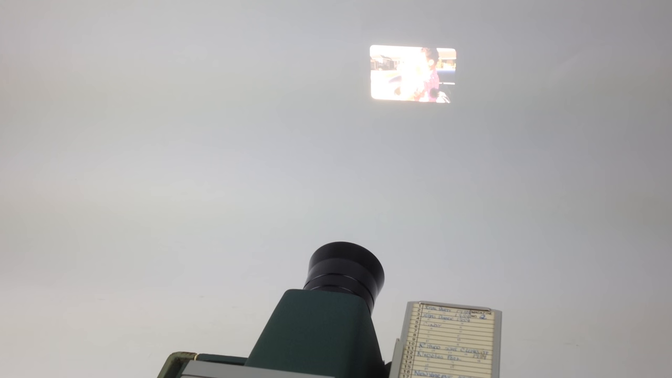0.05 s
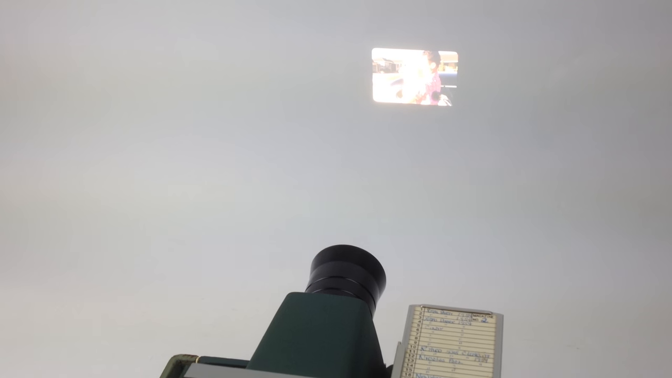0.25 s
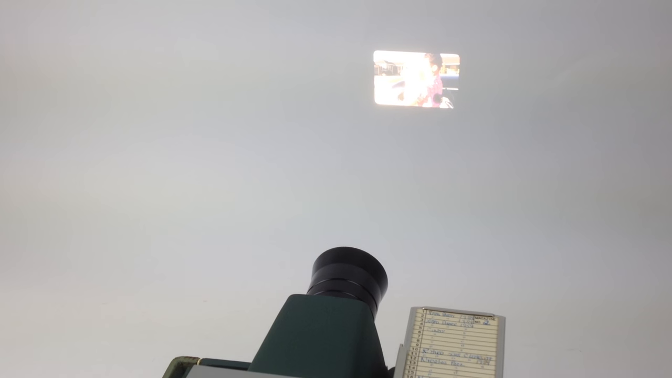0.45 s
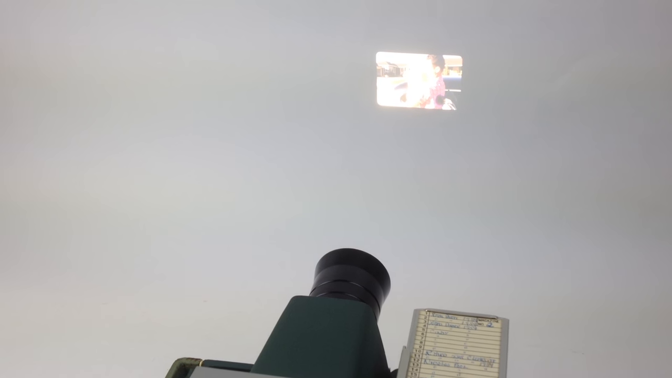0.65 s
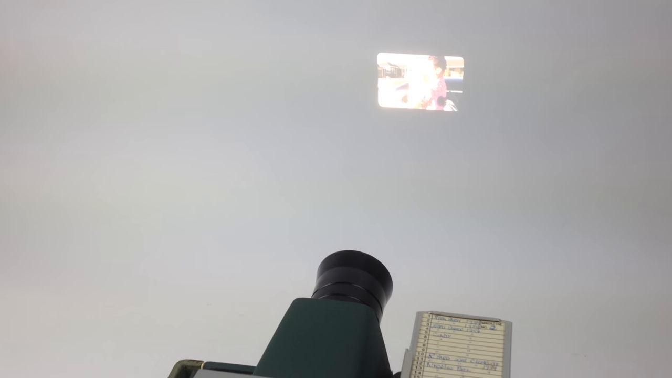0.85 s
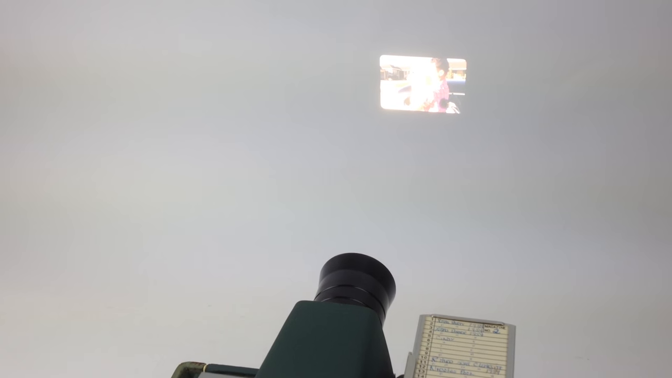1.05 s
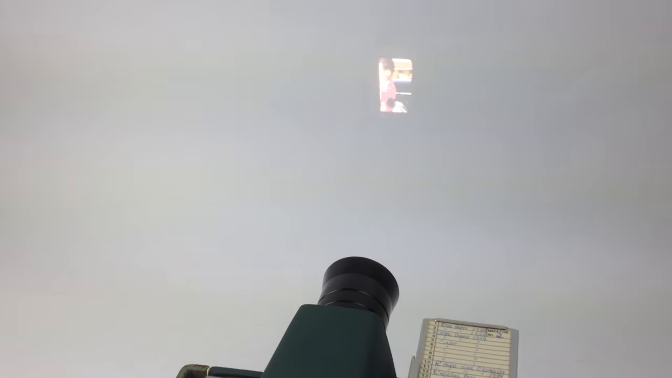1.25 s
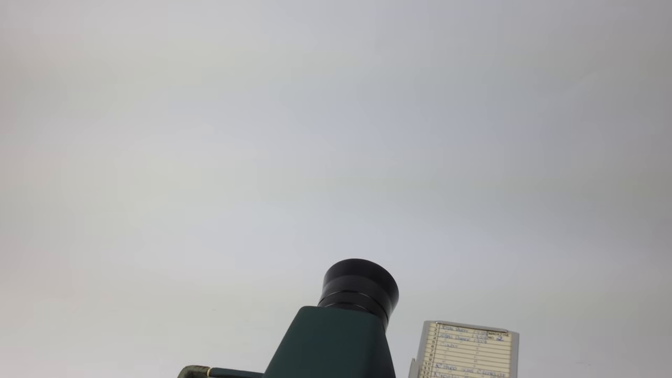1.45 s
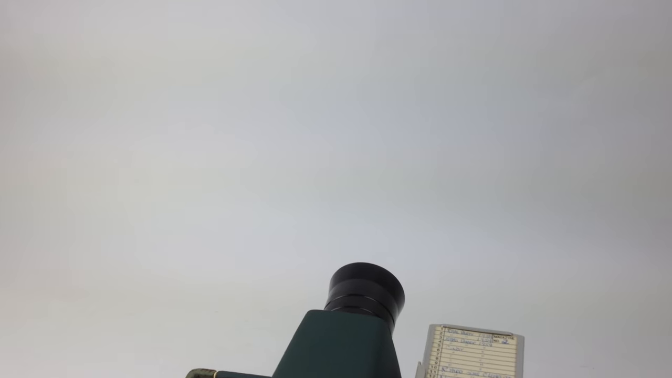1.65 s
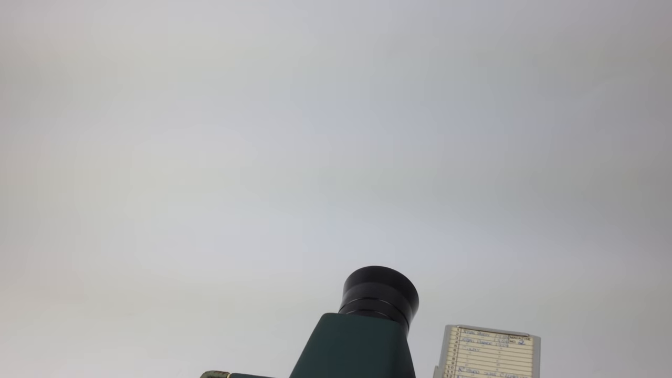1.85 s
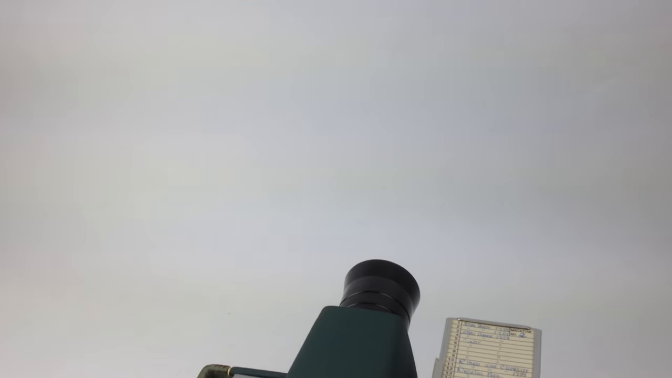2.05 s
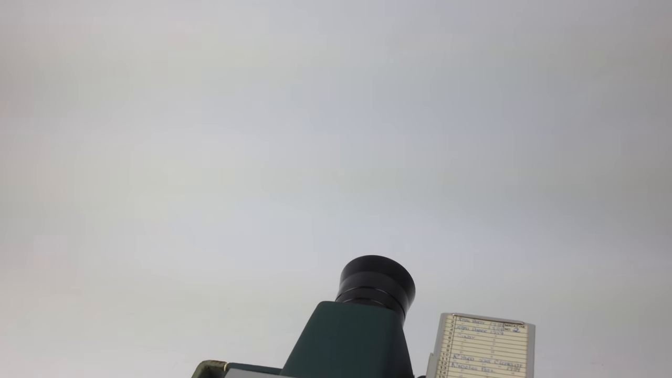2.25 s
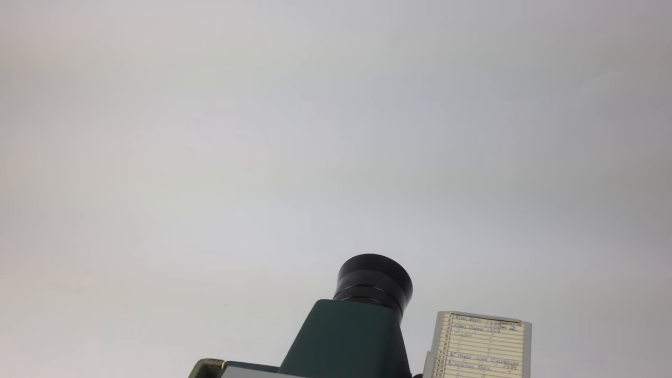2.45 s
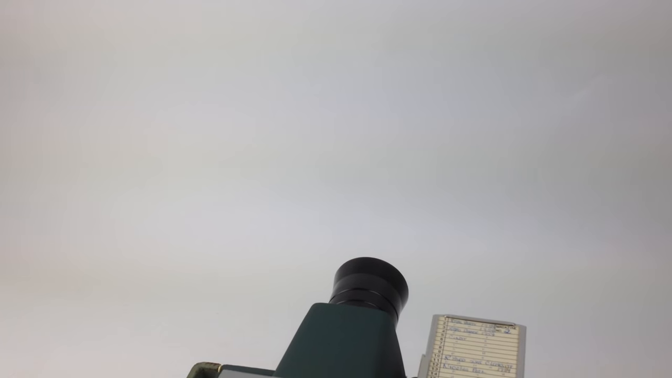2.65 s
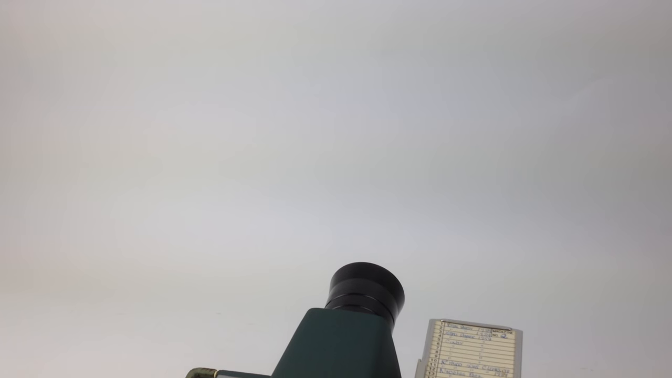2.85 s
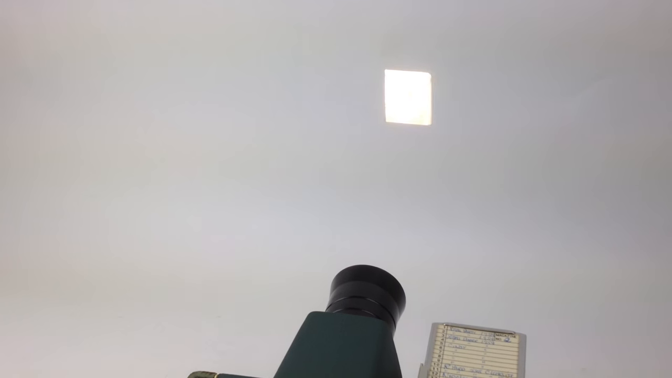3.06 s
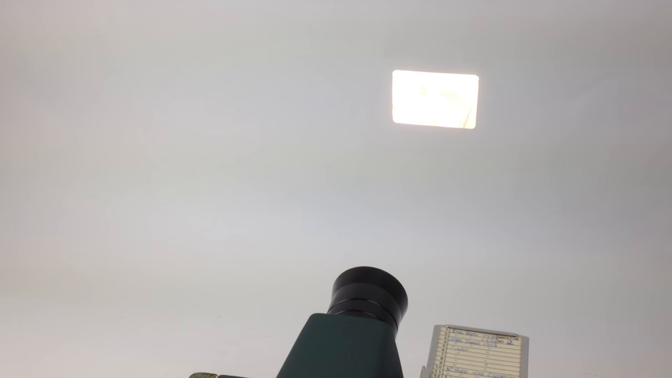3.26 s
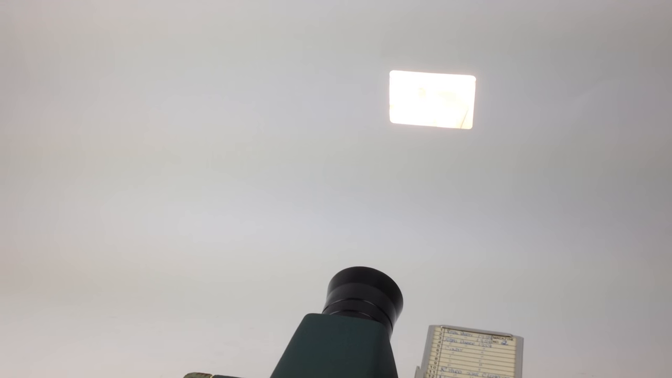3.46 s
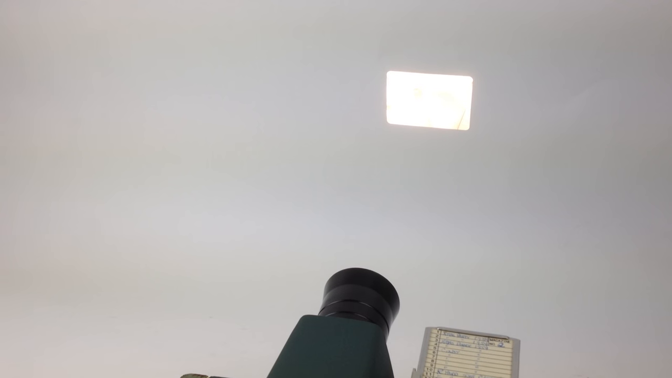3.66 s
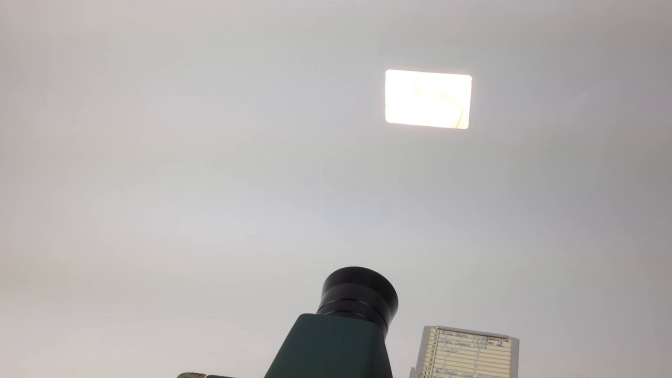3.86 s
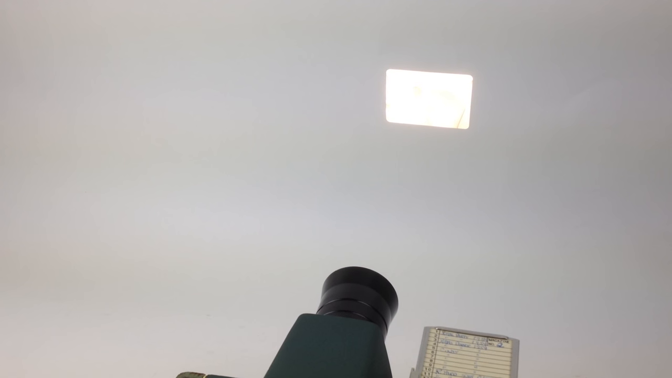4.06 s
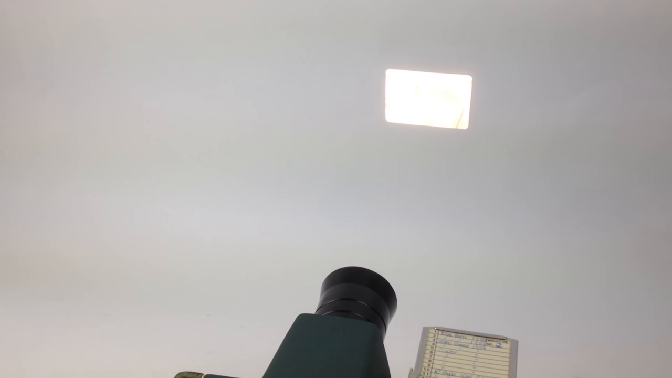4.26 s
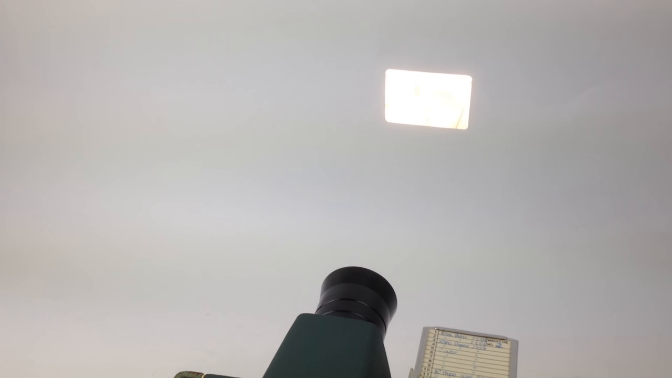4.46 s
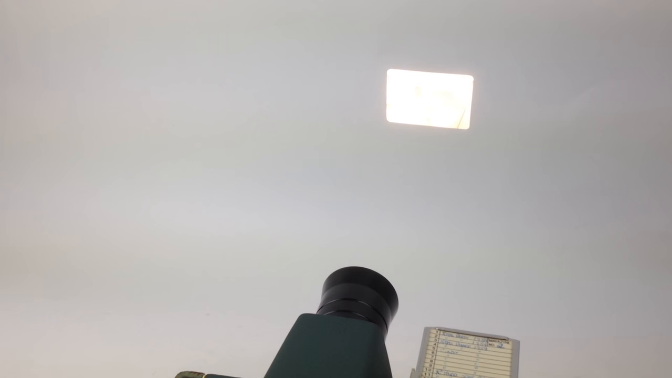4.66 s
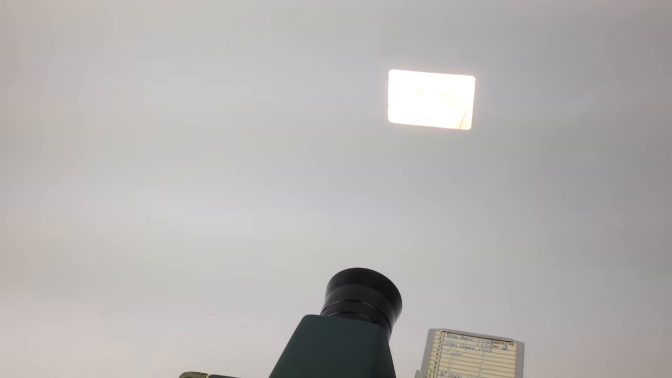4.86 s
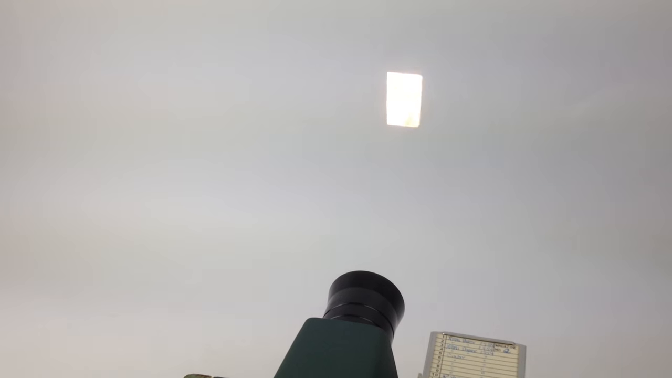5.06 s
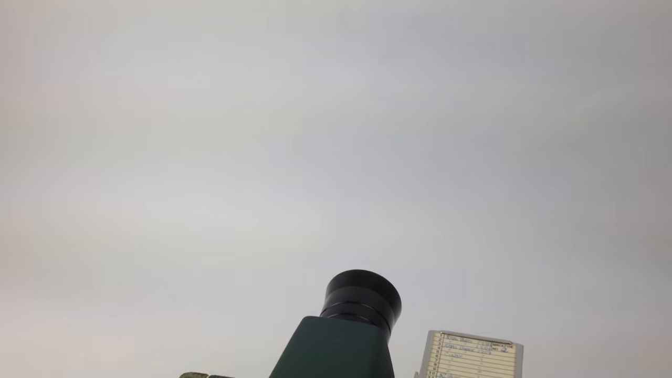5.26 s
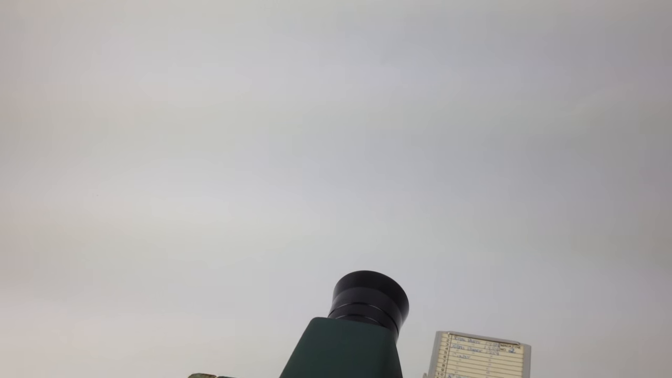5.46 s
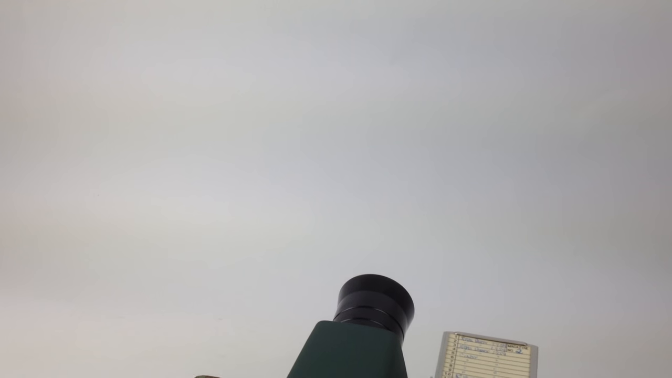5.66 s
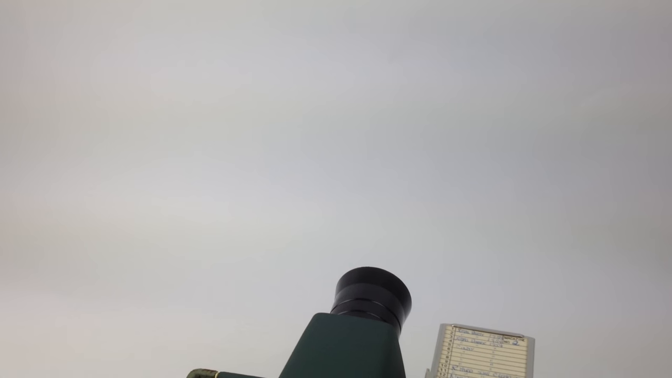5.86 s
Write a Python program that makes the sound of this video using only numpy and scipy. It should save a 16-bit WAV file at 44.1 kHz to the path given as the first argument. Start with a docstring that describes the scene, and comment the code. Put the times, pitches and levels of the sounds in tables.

```python
"""Slide projector in a small room

The cooling fan hums and rushes: filtered noise for the air, sine waves for blades and motor.
A hand works the slide changer three times. The carrier scrapes (random grains) and squeaks
(gliding sines), then clacks against its stop (bursts of filtered noise, some over hollow rings
of fading sines) while the slide rattles. A soft rub within a faint hiss comes early on.
Loud clacks make the recorder turn down, then creep back up."""
import sys
import numpy as np
from scipy import signal
from scipy.fft import rfft, irfft, next_fast_len
from scipy.io import wavfile
from scipy.ndimage import uniform_filter1d, minimum_filter1d

SR = 44100
rng = np.random.default_rng(int(sys.argv[2]) if len(sys.argv) > 2 else 0)


def wav_record(signal):
    """Record a signal, one row per channel, as 16-bit PCM in the file named by sys.argv[1]."""
    frames = np.transpose(np.atleast_2d(signal))
    bounded = np.clip(frames, -1, 1)
    # unit amplitude maps onto the largest positive 16-bit level
    quanta = np.round(bounded * 32767).astype(np.int16)
    wavfile.write(sys.argv[1], SR, quanta)


N = 261072
TIME = np.arange(N) / SR

# Hard contacts in the changer; hardness is the bright tick's level over the metal ring.
# Small level offsets and shares of t60_s for each part are set in the function.
# Columns: start_s, metal_db, hardness_db, knock_db, t60_s (time to fade by 60 dB)
CONTACTS = [(0.3215, -40, -28, -62, 0.013), (0.7995, -28.5, -2.5, -42, .022),
            (1.2245, -30.5, -37, -46, 0.036), (1.3045, -34, -8, -43, 0.06), (1.434, -25, -14, -40, 0.034),
            (1.4939, -24.5, -8, -48, 0.019), (1.748, -33.5, -11.5, -39, 0.072),
            (1.818, -23.5, -5.5, -42, 0.037), (1.826, -20, -15, -31, 0.046),
            (1.8413, -11, -23, -26.5, 0.034), (1.8444, -6.5, -15, -28.5, 0.02),
            (1.855, -20, -7, -25.5, 0.036), (1.868, -2.5, -19, -38, 0.032), (1.873, -26.5, 9.5, -32, 0.026),
            (2.95, -38.5, -1, -39, 0.023), (3.027, -23, -15.5, -41.5, 0.066), (3.069, -9, -6.5, -49, 0.024),
            (3.1007, -14, -7, -35, 0.044), (3.1271, -18, -2.5, -48, 0.021), (3.158, -26, -14, -37, 0.034),
            (3.1875, -17, -3.5, -51, 0.034), (3.1965, -11.5, -14.5, -26, 0.046),
            (3.3398, -24, -3.5, -41, 0.017), (5.017, -31.5, -28, -52, 0.031),
            (5.154, -35.5, -3.5, -58, 0.037), (5.257, -22.5, -15.5, -60, 0.04),
            (5.345, -32, -11, -58, 0.0078), (5.5824, -19, -12.5, -50, 0.053), (5.59, -26, -3, -30, .03),
            (5.597, -23.5, -2.5, -41, 0.057), (5.6141, -13, -10.5, -42, 0.022),
            (5.619, -26, 3.5, -22.5, 0.014), (5.651, -28.5, -4, -32.5, 0.075),
            (5.6607, -16, -5.5, -48, 0.027)]
# The many close tones of the sheet-metal carrier. Columns: pitch_hz, level_db (per Hz)
METAL_SPECTRUM = [(200, -52.5), (1500, -45), (2100, -22.5), (2400, -11), (3000, -19.5), (3500, -6.5),
                  (4200, -6), (4900, -5), (5600, -21), (8000, -43), (15500, -33.5)]
# The carrier's strongest resonances. Columns: pitch_hz, width_hz, boost_db
CARRIER_PEAKS = [(2500, 830, 6.5), (3470, 92, -4.5), (4030, 257, 2), (4190, 200, -5), (4085, 100, 4.5),
                 (4480, 170, -0.5)]
# A harder contact favours higher tones. Columns: hardness_db, pitch_hz
SPOT_BY_HARDNESS = [(-14.5, 3760), (1, 4340)]
# Resonances of the casing, also heard in the rub. Columns: pitch_hz, width_hz, level_db
CASING_MODES = [(342, 144, -6.5), (425, 119, -0.5), (717, 71, -10.5), (829, 95, -2.5), (1064, 44, 5),
                (1127, 101.6, -3), (1440, 63, -4), (1677, 79, -4), (1990, 125, -6.5)]
# The hard edge of a contact, also colours the hiss. Columns: pitch_hz, level_db (per Hz)
TICK_SPECTRUM = [(30, -29.5), (120, -43.5), (1500, -9), (4500, -1.5), (5600, -1), (7000, 0), (8400, -1),
                 (9500, -7), (11800, -6.5), (13200, -10.5), (15500, -33)]


def contacts(rows, knock_offset_db=-2.0, tick_offset_db=0.5, spot_spread=32, spot_db=10.5,
             attack_s=0.000291, snap=2.0, size=4096):
    """Each contact rings many close modes in carrier and casing, with a hard bright snap."""
    out = np.zeros(N + size)
    t = np.arange(size) / SR
    rise = 1 - np.exp(-t / attack_s)
    for start_s, metal_db, hardness_db, knock_db, t60_s in rows:
        noise = rng.standard_normal((3, 2 * size))
        fade_db = -60 * t / t60_s
        # the point struck favours some modes; a briefer contact spreads over more of them
        spot_hz = np.interp(hardness_db, *np.transpose(SPOT_BY_HARDNESS))
        spot = (spot_hz, spot_spread / t60_s, spot_db)
        # keep the second half, where the filters have settled
        carrier = colour(noise[0], METAL_SPECTRUM, list(CARRIER_PEAKS) + [spot])[size:]
        casing = resonate(noise[1], CASING_MODES)[size:]
        # the first touch is one sharp impulse, with dying micro-impacts
        impacts = snap * (t == 0) + noise[2, :size] * from_db(fade_db / 0.98)
        tick = colour(impacts, TICK_SPECTRUM)
        # the metal fades sooner than t60_s, the casing later
        ring = carrier * rise * from_db(fade_db / 0.79)
        knock = casing * rise * from_db(fade_db / 1.87)
        blow = at_level(ring, metal_db)
        blow += at_level(knock, knock_db + knock_offset_db)
        blow += at_level(tick, metal_db + hardness_db + tick_offset_db)
        start = round(start_s * SR)
        out[start:start + size] += blow
    return out[:N]


# The hand pushes the carrier along its rails. Columns: start_s, end_s, first_db, last_db
PUSHES = [(1.23, 1.297, -53, -49), (1.3, 1.437, -52, -34.5), (1.734, 1.823, -37.5, -46.5),
          (2.707, 2.736, -54, -50), (2.818, 3.071, -55.5, -43), (4.996, 5.05, -43, -41),
          (5.111, 5.28, -40.5, -45.5), (5.475, 5.579, -44, -57)]
PUSH_ATTACK_S, PUSH_RELEASE_DB_PER_S = 0.0027, 400
# The slide rattles in the carrier at the stop. Columns: start_s, end_s, level_db
RATTLES = [(1.829, 1.874, -31), (3.045, 3.166, -35), (5.588, 5.646, -26.5)]
RATTLE_ATTACK_S, RATTLE_RELEASE_DB_PER_S = 0.029, 700
# Colour of the friction. Columns: pitch_hz, level_db (per Hz)
FRICTION_SPECTRUM = [(200, -33.5), (1000, -7), (2000, -7), (3200, 1.5), (4300, -0.5), (5800, -12.5),
                     (8000, -15.5), (9500, -17), (12000, -19), (15500, -27.5)]


def scrape(grains_per_s=2200, uneven_db=12.0):
    """Tiny catches of the carrier on its rails and of the slide in the carrier, in uneven clumps."""
    sizes = rng.standard_normal(N) * from_db(uneven_db * np.tanh(drift(60)))
    grains = sizes * (rng.random(N) < grains_per_s / SR)
    movement = np.zeros(N)
    for start_s, end_s, first_db, last_db in PUSHES:
        level_db = np.interp(TIME, [start_s, end_s], [first_db, last_db])
        movement += from_db(level_db) * stroke(start_s, end_s, PUSH_ATTACK_S, PUSH_RELEASE_DB_PER_S)
    for start_s, end_s, level_db in RATTLES:
        movement += from_db(level_db) * stroke(start_s, end_s, RATTLE_ATTACK_S, RATTLE_RELEASE_DB_PER_S)
    return movement * rms_one(colour(grains, FRICTION_SPECTRUM))


def light_contacts(most_per_push=12, catches_per_s=20, typical_db=-39.5, spread_db=-3):
    """The carrier catches lightly as each push begins and at chance moments on its way."""
    hardness_db, knock_over_metal_db, t60_s = -13.5, -6, 0.059
    rows = []
    for start_s, end_s, _, _ in PUSHES:
        gaps = rng.uniform(0.58, 1.5, most_per_push) / catches_per_s
        # the first catch falls exactly at the start
        times = start_s + np.cumsum(gaps) - gaps[0]
        levels = typical_db + spread_db * rng.standard_normal(most_per_push)
        for time_s, metal_db in zip(times, levels):
            if time_s < end_s:
                rows.append((time_s, metal_db, hardness_db, metal_db + knock_over_metal_db, t60_s))
    return rows


# Rail squeaks. Columns: middle_s, half_length_s, pitch_hz, glide_octaves_per_s, level_db
SQUEAKS = [(1.353, .009, 4260, 2, -27.5), (1.389, .01, 3110, 0, -35), (1.424, .02, 3090, 0.5, -46),
           (5.106, .007, 4260, -12.5, -38), (5.156, .006, 4200, -1.5, -40), (5.214, .009, 4480, -1, -38.5),
           (5.225, .028, 3170, 4, -37), (5.513, .012, 3056, -3, -43)]


def squeaks(waver=0.022, overtone_db=-24):
    """Brief stick-slip whistles, steady or gliding, with a wavering pitch and weak overtones."""
    out = np.zeros(N)
    for middle_s, half_length_s, pitch_hz, glide, level_db in SQUEAKS:
        t = np.clip(TIME - middle_s, -half_length_s, half_length_s)
        jitter = waver * rms_one(uniform_filter1d(rng.standard_normal(N), size=60))
        phase = 2 * np.pi * np.cumsum(pitch_hz * 2 ** (glide * t) * (1 + jitter)) / SR
        swell = np.cos(np.pi / 2 * t / half_length_s) ** 2
        overtones = np.sin(2 * phase) + np.sin(3 * phase)
        out += from_db(level_db) * swell * (np.sin(phase) + from_db(overtone_db) * overtones)
    return out


# Hollow, low metallic ringing under some clacks. Columns: start_s, level_db
HOLLOW_RINGS = [(1.82, -35), (1.846, -38), (3.129, -32), (3.1981, -21.5), (3.342, -44.5), (5.616, -42)]
# Tones of each ring, relative to its level. Columns: pitch_hz, level_db, t60_s
HOLLOW_MODES = [(730, -15, 0.19), (844, -31, 0.15), (1004, -10.5, 0.19), (1456, -4, 0.1), (1726, -3, 0.085),
                (1990, 5, 0.026), (2280, -1, 0.13), (2454, -3, 0.21), (2960, 2, 0.093), (3170, 4.5, 0.046),
                (3470, -20, .1)]


def hollow_rings():
    """Each hollow ring is a set of sines of alternating sign that start together and fade."""
    out = np.zeros(N)
    for start_s, level_db in HOLLOW_RINGS:
        t = np.maximum(TIME - start_s, 0)
        for k, (pitch_hz, mode_db, t60_s) in enumerate(HOLLOW_MODES):
            fade_db = -60 * np.minimum(t / t60_s, 2)
            ring = from_db(level_db + mode_db + fade_db) * np.sin(2 * np.pi * pitch_hz * t)
            out += (-1) ** k * ring
    return out


# A soft low rub within a longer, faint bright hiss. Columns: start_s, end_s, level_db
RUB = (0.352, 0.43, -47)
HISS = (.16, 0.6, -74)


def rub_and_hiss(attack_s=0.05, release_db_per_s=300):
    """The rub is noise heard through the casing's resonances; the hiss is noise with a bright colour."""
    rub = rms_one(resonate(rng.standard_normal(N), CASING_MODES))
    hiss = rms_one(colour(rng.standard_normal(N), TICK_SPECTRUM))
    out = np.zeros(N)
    for sound, (start_s, end_s, level_db) in ((rub, RUB), (hiss, HISS)):
        out += from_db(level_db) * stroke(start_s, end_s, attack_s, release_db_per_s) * sound
    return out


# Colour of the air through fan and vents. Columns: pitch_hz, level_db (relative, per Hz)
AIR_SPECTRUM = [(25, -8), (60, -5), (90, -14.5), (120, -12.5), (150, 0.1), (200, -1.8), (520, 1.2),
                (610, -9), (700, -6.5), (1250, -4), (1550, -7.5), (2200, -9.6), (3500, 0.8), (4500, -3),
                (6000, -21), (8400, -25.5), (9500, -32.5), (15500, -34.9)]
# Air resonances of the housing. Columns: pitch_hz, width_hz, boost_db
DUCT_PEAKS = [(352, 38, 2.5), (505.5, 63, 2.5), (656, 33.1, 7.5), (827, 74, 11.5), (1028, 64, 13.5),
              (1120, 45, 7.5), (1418, 29.5, 7.5), (1775, 34, 6), (1939, 55, 7.5), (2536, 230, 6.5),
              (2800, 69, 3.5)]
# Hum of the passing blades. Columns: multiple (of the blade pitch), level_db (rms)
BLADE_ORDERS = [(1, -56), (2, -57), (3, -67), (4, -66), (5, -66.5), (6, -61.5)]
# Levels in dB are rms
AIR_DB, BLADE_HZ, MOTOR_HZ, MOTOR_DB = -46, 185.3, 240.2, -68


def fan(wobble=0.003916, flutter_db=0.1):
    """Rushing air in the housing, the blade-passing hum and the motor's steady hum."""
    air = from_db(AIR_DB) * rms_one(colour(rng.standard_normal(N), AIR_SPECTRUM, DUCT_PEAKS))
    phase = 2 * np.pi * np.cumsum(BLADE_HZ * (1 + wobble * drift(8))) / SR
    hum = from_db(MOTOR_DB) * np.sin(2 * np.pi * MOTOR_HZ * TIME)
    for multiple, level_db in BLADE_ORDERS:
        # uneven inflow makes the higher orders flutter more
        flutter = flutter_db * np.sqrt(multiple) * drift(8.2)
        start_phase = rng.uniform(0, 2 * np.pi)
        hum += from_db(level_db + flutter) * np.sin(round(multiple) * phase + start_phase)
    return air + np.sqrt(2) * hum  # turns the rms levels into sine peaks


# How long the room's echoes last. Columns: pitch_hz, t60_s
ROOM_T60 = [(200, 0.087), (1000, 0.35), (2500, 0.22), (4000, 0.14), (8000, .17), (15000, 0.17)]


def room(x, wet_db=-8.5, low_boost_db=6.5, build_s=0.0013, size=20000):
    """Dense wall echoes, as fading bands of noise, build up quickly and last longest near 1000 Hz."""
    t = np.arange(size) / SR
    tail = np.zeros(size)
    edges = np.geomspace(150, 16000, num=11)
    for low, high in zip(edges, edges[1:]):
        band_pass = signal.butter(2, [low, high], "band", fs=SR, output="sos")
        band = signal.sosfilt(band_pass, rng.standard_normal(size))
        middle_hz = np.sqrt(low * high)
        build = 1 - np.exp(-(t / build_s) ** 2)
        fade = from_db(-60 * t / at_hz(ROOM_T60, middle_hz)) * build
        # lower bands echo more strongly
        boost = from_db(low_boost_db / (1 + (middle_hz / 2500) ** 2))
        tail += band * fade / np.sqrt(np.sum(fade ** 2)) * boost
    return x + from_db(wet_db) * signal.fftconvolve(x, tail)[:N]


def stroke(start_s, end_s, attack_s, release_db_per_s):
    """Envelope of a movement: it swells, holds until its end and dies away."""
    swell = np.clip((TIME - start_s) / attack_s, 0, 1)
    return swell * from_db(-release_db_per_s * np.maximum(TIME - end_s, 0))


def from_db(db):
    """Turn decibels into a gain."""
    return 10 ** (np.asarray(db) / 20)


def rms_one(x):
    """Scale a sound to an rms (average strength) of one."""
    return x / np.sqrt(np.mean(x ** 2) + 1e-20)


def at_level(x, db, size=132):
    """Scale a blow so that its loudest three milliseconds have this rms level."""
    return x * from_db(db) / np.sqrt(uniform_filter1d(x ** 2, size).max())


def at_hz(points, hz):
    """Read a table of pitch_hz and value on a log-frequency axis."""
    table_hz, value = np.transpose(points)
    return np.interp(np.log(np.maximum(hz, 1)), np.log(table_hz), value)


def drift(knots_per_s):
    """Random wandering: straight lines between chance values."""
    knots = rng.standard_normal(400)
    return np.interp(TIME * knots_per_s, np.arange(len(knots)), knots)


def colour(x, spectrum, peaks=()):
    """Filter with a broad spectrum and resonant bumps; it never sounds early (minimum phase)."""
    size = 2 * next_fast_len(len(x))
    hz = np.arange(size // 2 + 1) * SR / size
    db = at_hz(spectrum, hz)
    for peak_hz, width_hz, boost_db in peaks:
        db = db + boost_db / (1 + (2 * (hz - peak_hz) / width_hz) ** 2)
    # folding the cepstrum (transform of the log spectrum) forward in time gives minimum phase
    cepstrum = irfft(np.log(from_db(db)))
    cepstrum[1:size // 2] *= 2
    cepstrum[size // 2 + 1:] = 0
    return irfft(rfft(x, size) * np.exp(rfft(cepstrum)))[:len(x)]


def resonate(x, modes):
    """Resonances side by side, with alternating sign."""
    out = np.zeros(len(x))
    for k, (pitch_hz, width_hz, level_db) in enumerate(modes):
        r = np.exp(-np.pi * width_hz / SR)
        poles = [1, -2 * r * np.cos(2 * np.pi * pitch_hz / SR), r * r]
        zeros = [(1 - r * r) / 2, 0, (r * r - 1) / 2]
        out += (-1) ** k * from_db(level_db) * signal.lfilter(zeros, poles, x)
    return out


def scene():
    """The changer sounds in the room, with the hollow rings, the rub and hiss and the steady fan."""
    background = rub_and_hiss() + fan()
    changer = scrape() + squeaks() + contacts(CONTACTS) + contacts(light_contacts())
    return (room(changer) + hollow_rings() + background)[None]


def gain_control(x, limit_db=-7.5, release_db_per_s=2.0, size=132):
    """The gain drops just ahead of a sound that passes the limit, then creeps back."""
    level_db = 10 * np.log10(np.maximum(uniform_filter1d(x ** 2, size), 1e-12))
    over_db = -minimum_filter1d(np.minimum(limit_db - level_db, 0), size)
    # hold the largest excess and let it shrink at the release rate
    creep_db = release_db_per_s * TIME
    held_db = np.maximum.accumulate(over_db + creep_db, axis=-1) - creep_db
    return x * from_db(-uniform_filter1d(held_db, size))


def record(dry, ceiling=0.73, low_cut_hz=115, top_cut_hz=15700):
    """The recorder: gain control, rounded peaks, a thin bass and a steep top cut."""
    held = gain_control(dry)
    rounded = held / (1 + (held / ceiling) ** 8) ** (1 / 8)
    low_cut = signal.butter(3, low_cut_hz, "high", fs=SR, output="sos")
    top_cut = signal.ellip(10, 0.1, 90, top_cut_hz, fs=SR, output="sos")
    thinned = signal.sosfilt(low_cut, rounded)
    return signal.sosfilt(top_cut, thinned)


dry = scene()
out = record(dry)
wav_record(out)
```